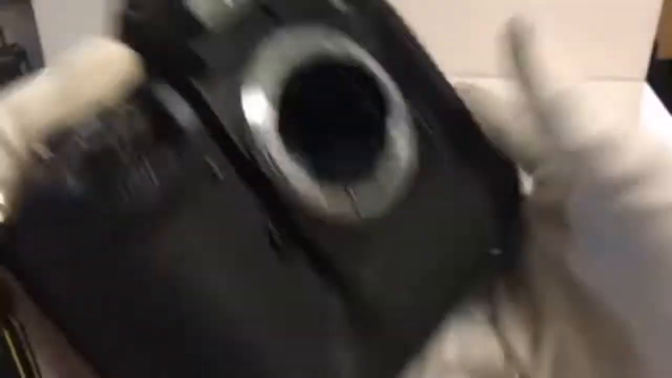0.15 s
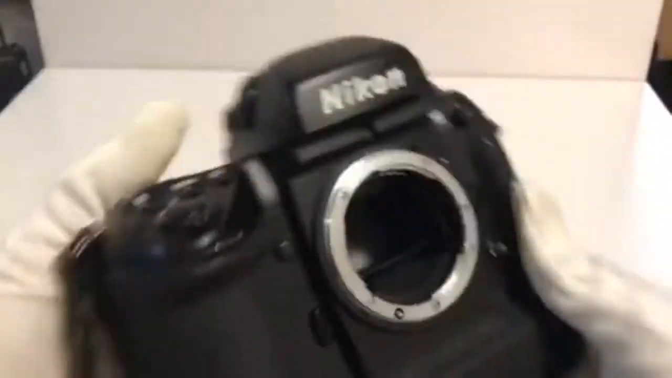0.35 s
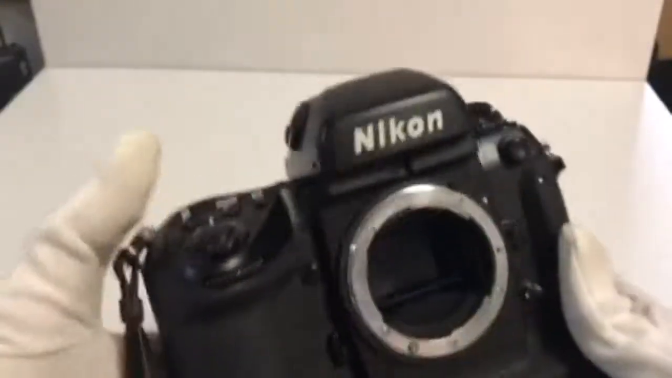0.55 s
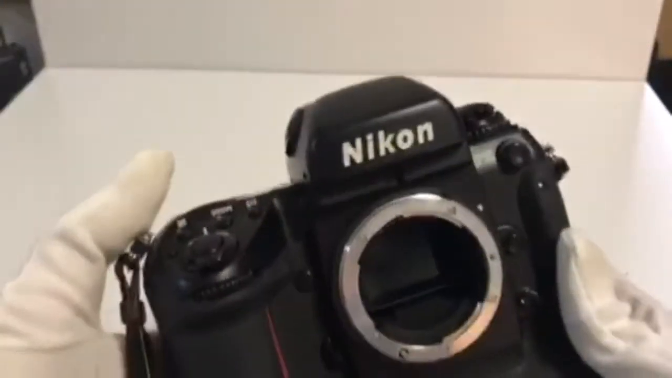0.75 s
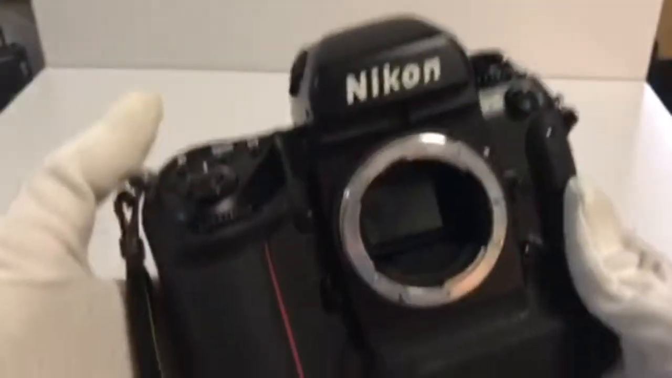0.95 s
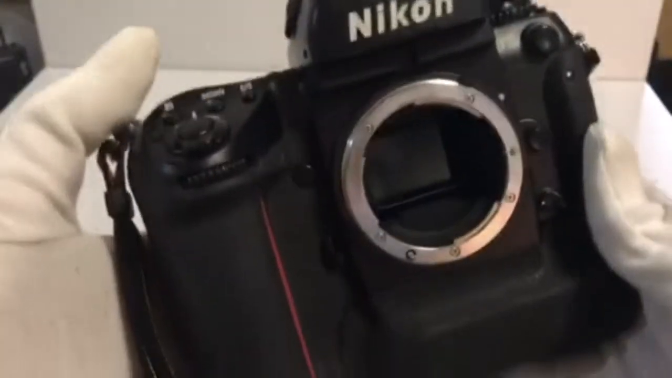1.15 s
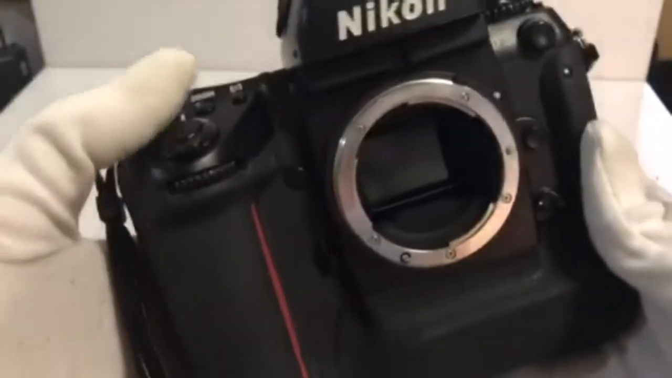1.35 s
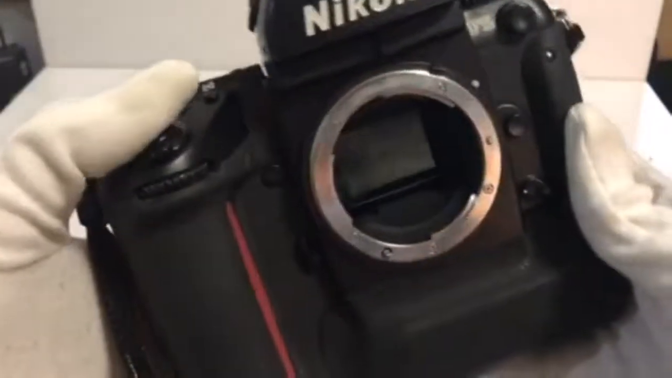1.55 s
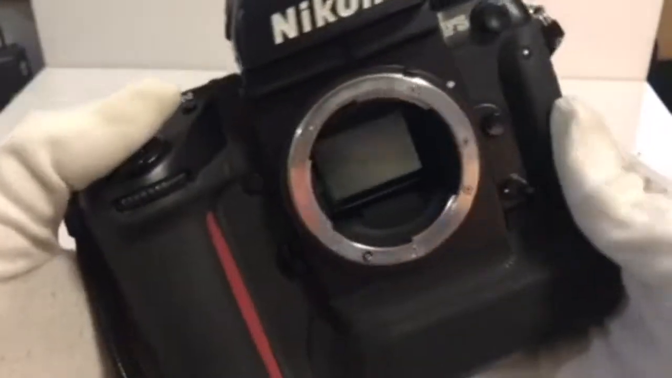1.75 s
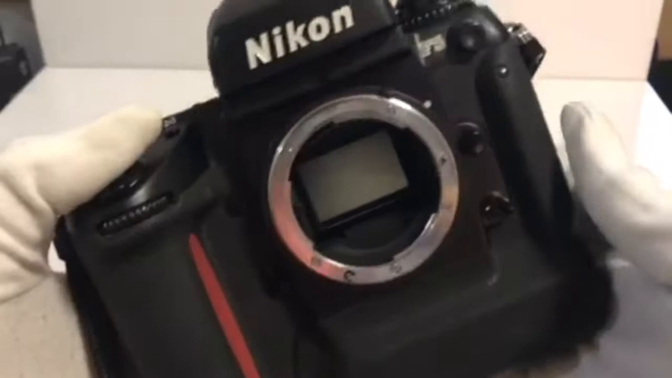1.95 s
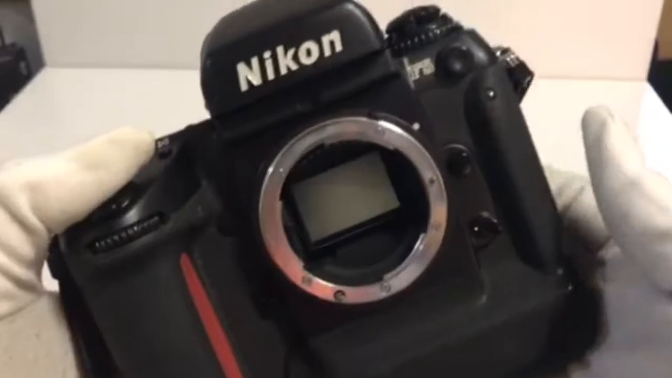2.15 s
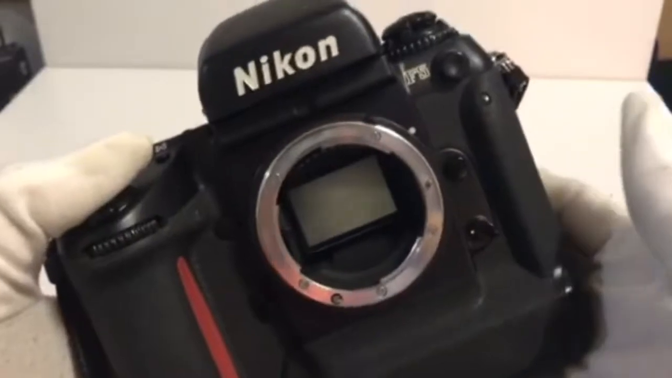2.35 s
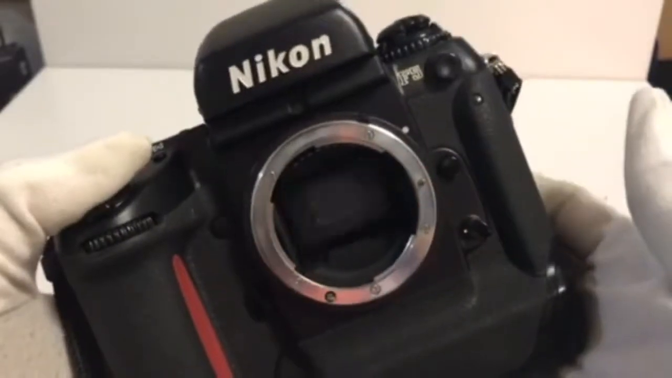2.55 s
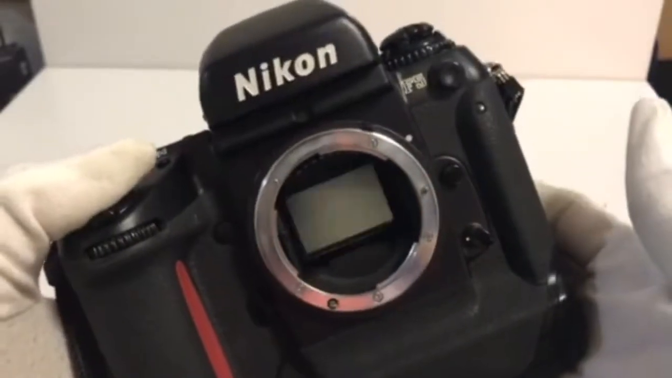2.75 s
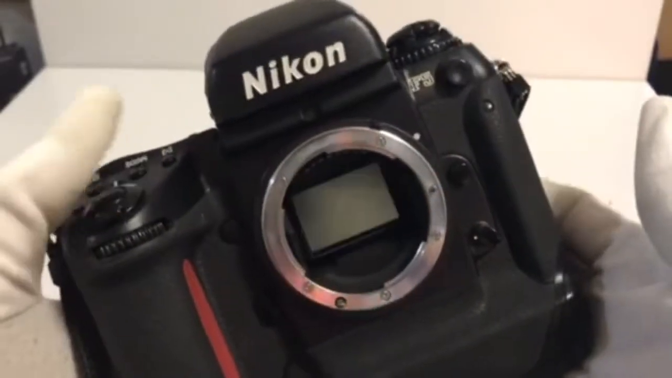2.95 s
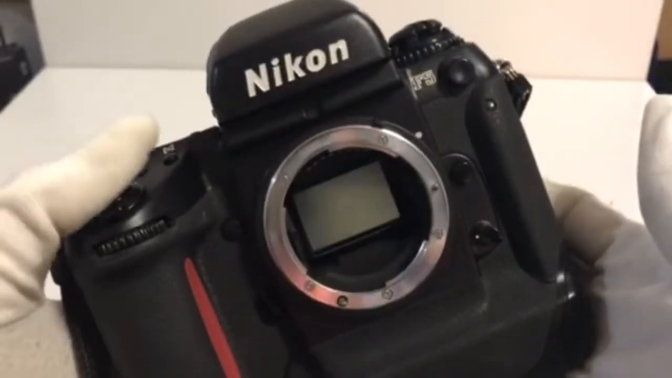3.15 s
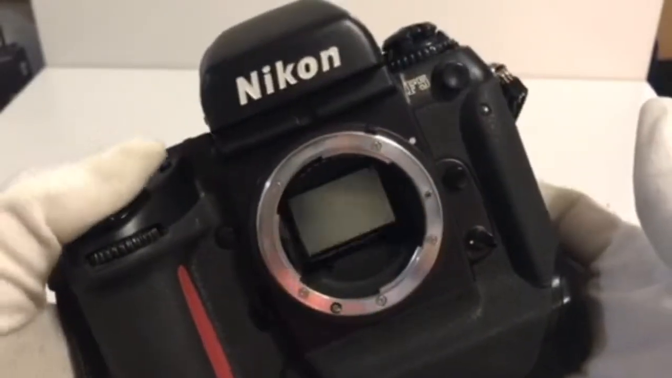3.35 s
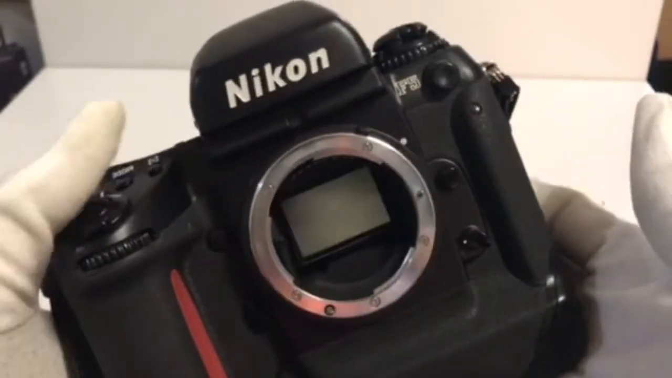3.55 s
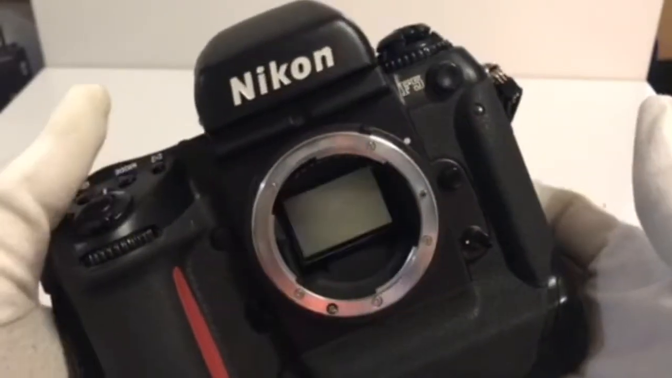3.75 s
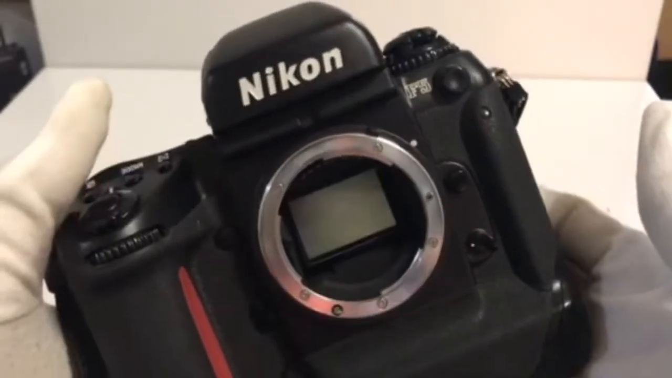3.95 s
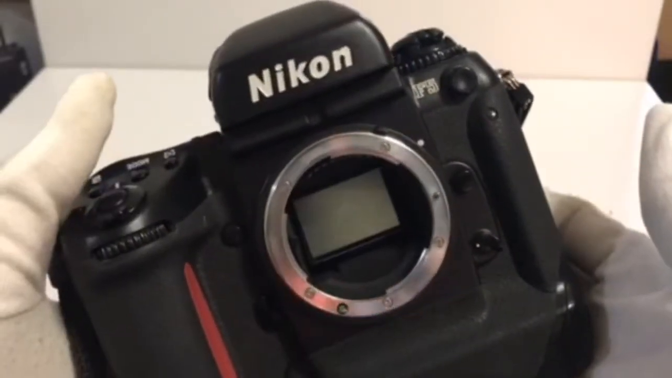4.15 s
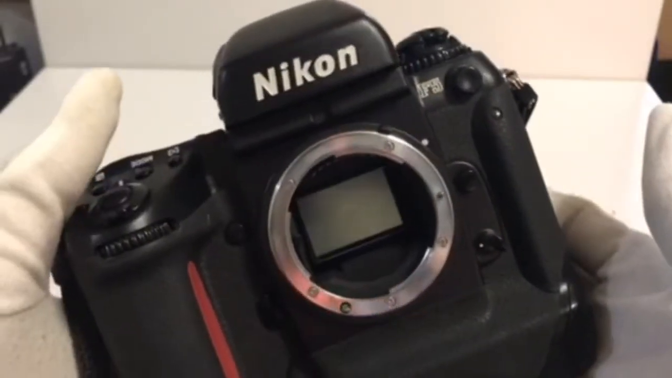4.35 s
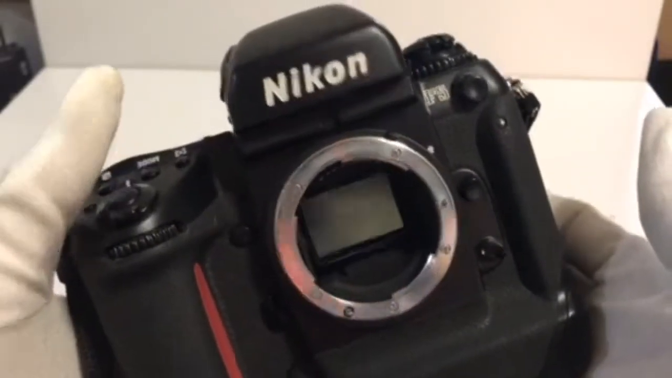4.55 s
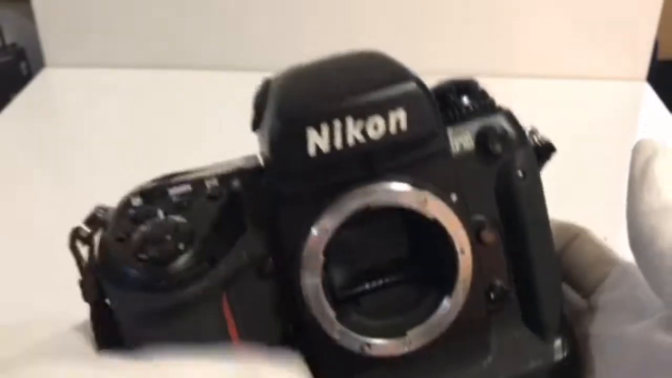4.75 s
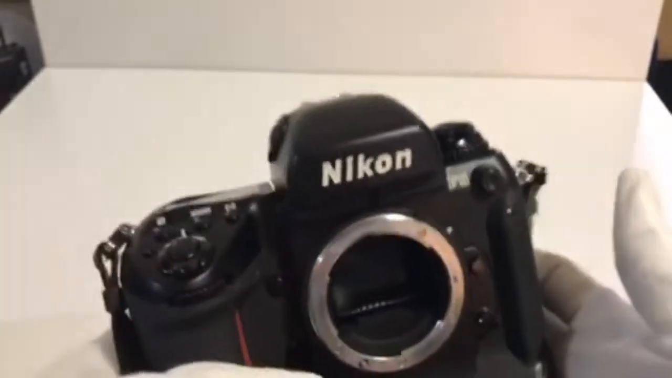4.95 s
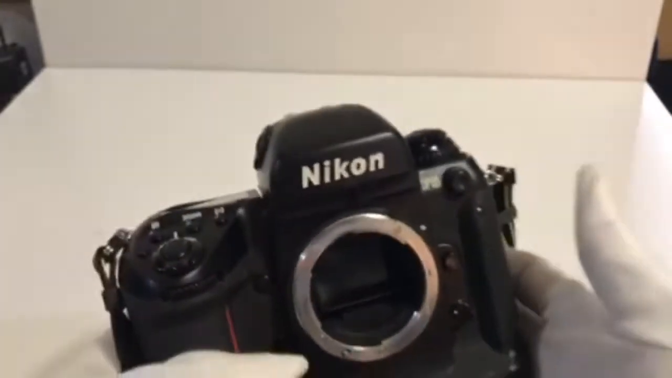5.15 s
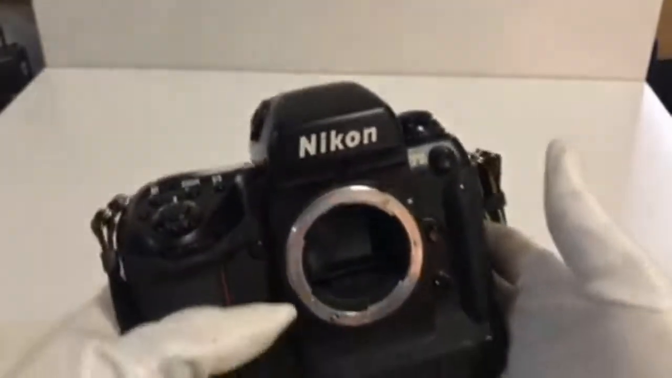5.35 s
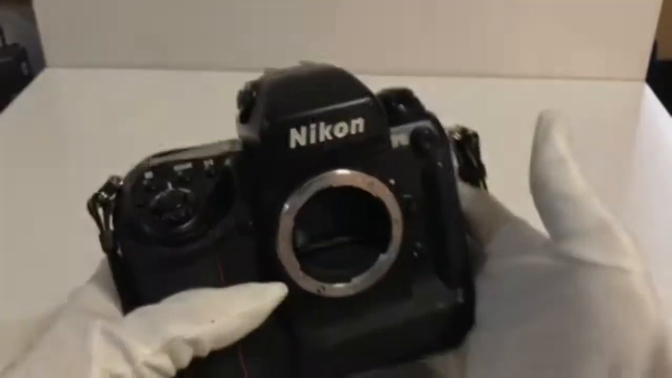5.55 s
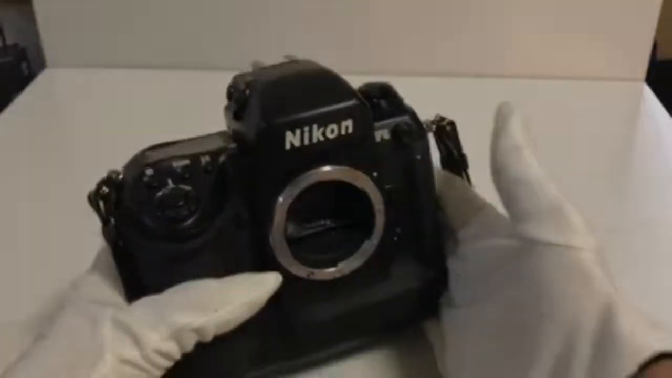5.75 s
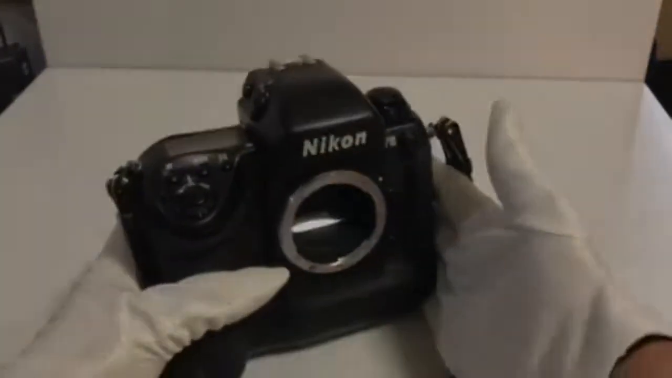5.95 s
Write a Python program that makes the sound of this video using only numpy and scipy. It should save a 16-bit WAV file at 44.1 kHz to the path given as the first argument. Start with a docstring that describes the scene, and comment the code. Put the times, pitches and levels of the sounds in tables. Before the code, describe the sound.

In a small quiet room, gloves rub faintly on a camera and it knocks softly against a table. Then, close to the microphone, the motor-driven film camera fires a quick burst of four sharp shutter and mirror clacks over chattering gears, followed by a burst of two. Faint rubbing, small strap ring ticks and a dull table bump follow, over a low appliance hum.

```python
"""In a small quiet room, a motor-driven film camera held close in gloved hands fires two short bursts.
Every frame repeats one chain of clicks (release, mirror up, shutter, mirror down, latches) over the
chatter of the winding gears; each click is a tiny rattle that sets its own part ringing. Before and
after, gloves rub on the camera, its strap rings tick and it bumps the table. An appliance hums
underneath, with a faint whine. A soft hiss comes up after the first burst and cuts off after the second.
"""
import sys
import numpy as np
from scipy import signal
from scipy.fft import rfft, irfft
from scipy.io import wavfile

SR = 44100
rng = np.random.default_rng(int(sys.argv[2]) if len(sys.argv) > 2 else 0)


def wrap_up_sound(samples):
    """Save the sound to the file named by the first command line argument, as 16-bit audio."""
    columns = np.atleast_2d(samples).T
    # keep every value between -1 and 1, then stretch to whole-number steps
    tamed = np.clip(columns, -1, 1)
    steps = np.round(tamed * 32767).astype(np.int16)
    wavfile.write(sys.argv[1], SR, steps)


N = 269010
TIME = np.arange(N) / SR


def from_db(db):
    return 10 ** (np.asarray(db) / 20)


def unit_level(x):
    """Scale a signal to an average power of 1."""
    return x / np.sqrt(np.mean(np.abs(x) ** 2) + 1e-20)


def at_hz(points, hz):
    """Read between the rows of a table that goes by frequency."""
    known_hz, values = np.transpose(points)
    return np.interp(np.log(np.maximum(hz, 1)), np.log(known_hz), values)


def add(track, start_s, sound):
    start = round(start_s * SR)
    track[start:start + len(sound)] += sound[:N - start]


def resonate(force, tone, modes=(), size=16384):
    """Shape a force as an object would: a broad tone, plus modes (pitches it likes to ring at)."""
    hz = np.fft.rfftfreq(size, 1 / SR)
    peaks = sum((from_db(db) ** 2 - 1) / (1 + (2 * (hz - pitch) / width) ** 2)
                for pitch, width, db in modes)
    gain = unit_level(from_db(at_hz(tone, hz)) * np.sqrt(np.abs(1 + peaks)))
    cepstrum = irfft(np.log(gain))[:size // 2]
    cepstrum[1:] *= 2   # minimum phase: nothing sounds before the blow
    response = irfft(np.exp(rfft(cepstrum, size)))
    return signal.fftconvolve(force, response)[:N]


def hiss_band(hz, width):
    """Noise gathered around one pitch."""
    return unit_level(signal.lfilter(*signal.iirpeak(hz, hz / width, fs=SR), rng.standard_normal(N)))


def swell(peak_s, rise_s, fall_s):
    """A smooth rise and fall in loudness."""
    return np.exp(-((TIME - peak_s) / np.where(TIME < peak_s, rise_s, fall_s)) ** 2)


def grains(spread_db):
    """A dense stream of tiny impacts of uneven size."""
    return unit_level(rng.standard_normal(N) * from_db(spread_db * np.minimum(rng.exponential(1, N), 5)))


def rattle(fade_s, habit=0, rise_s=.0003):
    """One contact: tiny impacts that die by 60 dB in fade_s; habit is a pattern that repeats."""
    t = np.arange(int(1.5 * fade_s * SR)) / SR
    fade = from_db(-60 * t / fade_s) * (1 - np.exp(-t / rise_s))
    flurry = (habit + rng.standard_normal(SR))[:len(t)]
    for _ in range(6):   # even it out so all frequencies are about equally strong
        even = irfft(np.exp(1j * np.angle(rfft(flurry * fade))), len(t))
        flurry = unit_level(even * fade / (fade ** 2 + 1e-3))
    return flurry * fade


# how long the room rings (frequency [Hz], time to fade by 60 dB [s])
ROOM_FADE = [(200, .36), (1500, .32), (4000, .24), (9000, .23), (16000, .18)]
def room_tail(sound, build_s=0.0071):
    """Many reflections blur into a short tail, the treble dying first."""
    t, tail = TIME[:SR // 2], 0
    edges = np.geomspace(120, 17000, 13)
    for low, high in zip(edges, edges[1:]):
        band = signal.butter(2, [low, high], "band", fs=SR, output="sos")
        fade = from_db(-60 * t / at_hz(ROOM_FADE, np.sqrt(low * high)))
        tail = tail + signal.sosfilt(band, rng.standard_normal(len(t))) * fade
    tail = tail * (1 - np.exp(-t / build_s))
    return signal.fftconvolve(sound, tail / np.linalg.norm(tail))[:N]


# tone of the room's air (frequency [Hz], relative level [dB])
AIR_TONE = [(15, -44), (25, -15.5), (39, -10), (59, -4.5), (74, -8), (87, -18.5), (120, -10.5), (206, -26),
            (344, -28), (775, -37), (1020, -34.5), (1160, -36), (4370, -48), (5000, -51), (16000, -56)]
# where the air rings (pitch [Hz], width [Hz], boost [dB])
AIR_MODES = [(343, 43, 7.3), (1024, 230, 4.9)]
def room_air():
    """A steady, soft rumble."""
    return from_db(-53) * resonate(rng.standard_normal(N), AIR_TONE, AIR_MODES)


# the whine's thin tones (pitch [Hz], width [Hz], level [dB])
WHINE_TONES = [(4500, 50, -83.5), (6480, 50, -92), (9060, 25, -94)]
def whine():
    """Very narrow bands of noise make a faint, steady whine."""
    return sum(from_db(level_db) * hiss_band(hz, width) for hz, width, level_db in WHINE_TONES)


# how loud the hum is as time passes (time [s], level [dB])
HUM_LEVEL = [(0.0, -46), (0.76, -55.5), (0.84, -44), (1.18, -54), (1.23, -46), (1.48, -61), (1.69, -46.5),
             (2.81, -53), (3.86, -50), (3.88, -56), (4.21, -44), (4.49, -54), (4.78, -45), (4.9, -56),
             (5.88, -50), (5.9, -53)]
# the hum's tones (pitch [Hz], relative level [dB], share that wavers [0-1])
HUM_TONES = [(56.2, -1.5, 0.4), (117, -6, 0.3)]
def appliance_hum(waver_hz=8.0):
    """An appliance hums with two low, wavering tones."""
    hum, slow = 0, signal.butter(4, waver_hz, fs=SR, output="sos")
    for hz, level_db, waver in HUM_TONES:
        noise = rng.standard_normal(N + SR) + 1j * rng.standard_normal(N + SR)
        sway = signal.sosfilt(slow, noise)[SR:]
        sway = unit_level(sway / np.sqrt(np.abs(sway)))   # more in pitch than in level
        tone = np.real((1 - waver + waver * sway) * np.exp(2j * np.pi * hz * TIME))
        hum = hum + from_db(level_db) * unit_level(tone)
    return from_db(np.interp(TIME, *np.transpose(HUM_LEVEL))) * hum


# tone of the hiss (frequency [Hz], relative level [dB])
HISS_TONE = [(500, 4), (2000, 0.5), (5000, -0.5), (9000, -4), (15500, -8.5)]
def soft_hiss(on_s=2.9, off_s=4.06, rise_s=.08, fall_s=.01):
    """A hiss comes up as the first burst ends, holds, and stops abruptly a little after the second."""
    held = np.clip((TIME - on_s) / rise_s, 0, 1) * np.clip((off_s - TIME) / fall_s, 0, 1)
    return from_db(-63.5) * held * resonate(rng.standard_normal(N), HISS_TONE)


# each shift of grip (time of peak [s], rise [s], fall [s], level [dB])
GLOVE_STROKES = [(.02, .1, 0.1, -62), (.25, .03, 0.11, -62.5), (.43, .045, .09, -55), (.55, .06, .08, -61),
                 (1.40, 0.063, 0.084, -73.5), (4.72, 0.078, 0.075, -67.5), (5.2, 0.37, .2, -66.5),
                 (5.33, 0.042, .04, -56.5), (5.56, 0.17, 0.14, -62.5), (5.91, 0.22, 0.088, -56.5)]
# tone of the rubbing (frequency [Hz], relative level [dB])
GLOVE_TONE = [(710, -38), (1200, -5.5), (3360, -2), (4910, -4), (9310, -3), (10300, -5.5), (14700, -1),
              (16000, -5.5)]
def gloves(catch_db=1.6, catch_hz=80):
    """Cotton fibres catch and slip on the camera in clumps; each stroke swells and fades."""
    slow = signal.butter(2, catch_hz, fs=SR, output="sos")
    catching = unit_level(signal.sosfilt(slow, rng.standard_normal(N)))
    power = sum((from_db(db) * swell(s, rise, fall)) ** 2 for s, rise, fall, db in GLOVE_STROKES)
    return np.sqrt(power) * from_db(catch_db * catching) * resonate(grains(spread_db=3.5), GLOVE_TONE)


# short slides (time of peak [s], length [s], level [dB], pitch [Hz], width [Hz])
SLIDES = [(0.653, .08, -75.5, 6500, 1000), (0.818, .09, -72.5, 6500, 1000),
          (0.92, 0.078, -71.5, 6500, 1000), (1.043, 0.099, -70, 2500, 2500),
          (4.71, 0.22, -67.5, 2110, 2480), (5.581, 0.19, -63, 11900, 3446), (6.001, 0.092, -58, 2800, 1200)]
def slides():
    """Cloth and rubber slide briefly, each time with a hiss of its own pitch."""
    return sum(from_db(level_db) * swell(s, length / 2, length / 2) * hiss_band(hz, width)
               for s, length, level_db, hz, width in SLIDES)


# ticks of the strap rings and fittings (time [s], level [dB], pitch [Hz], width [Hz])
STRAP_TICKS = [(0.293, -46, 8400, 1500), (1.781, -48.5, 3920, 600), (2.429, -57.5, 6435, 6000),
               (4.712, -54, 12000, 6000), (5.003, -50, 12000, 9000), (5.0236, -39, 11000, 13000),
               (5.1280, -39.5, 8260, 11800), (5.5, -39, 4600, 2800), (5.589, -37.5, 1480, 600),
               (5.852, -43, 10700, 9000)]
# tone of the metal (frequency [Hz], relative level [dB])
METAL_TONE = [(400, 1), (1500, -2), (15000, -4)]
# where the metal rings (pitch [Hz], width [Hz], boost [dB])
METAL_MODES = [(2750, 100, 12), (5650, 220, 11), (6380, 120, 9.5), (9100, 110, 8), (10000, 120, 7),
               (12500, 300, 10), (13300, 200, 9)]
def strap_rings(fade_s=0.017, faint_per_s=5, faint_db=-46):
    """Metal touches metal and sets the strap rings ringing; fainter ticks come at random."""
    force = np.zeros(N)
    for s, level_db, hz, width in STRAP_TICKS:
        band = signal.iirpeak(hz, hz / width, fs=SR)
        add(force, s, from_db(level_db) * signal.lfilter(*band, rattle(fade_s)))
    faint = (rng.random(N) < faint_per_s / SR) * rng.uniform(-1, 1, N)
    return resonate(force + from_db(faint_db) * faint, METAL_TONE, METAL_MODES)


# the camera meets the table (time [s], level [dB], dulled above [Hz], rocking time [s])
BUMPS = [(0.055, -45.5, 600, 0.09), (0.575, -25, 725, 0.054), (0.590, -39, 600, 0.1),
         (0.621, -37, 400, 0.08), (5.824, -40.5, 700, 0.083), (5.852, -43, 700, 0.11),
         (5.951, -33, 3500, 0.02), (5.952, -39, 900, 0.15)]
# tone of the table (frequency [Hz], relative level [dB])
TABLE_TONE = [(50, -35), (110, 1.5), (200, 4.5), (290, -7), (460, -3), (1000, -12.5), (1700, -13),
              (2500, -19), (15000, -9)]
# where the table rings (pitch [Hz], width [Hz], boost [dB])
TABLE_MODES = [(117.5, 13, 13.5), (234, 14, 7.5), (412, 49, 8), (618, 29, 5.5), (770, 16, 6.5)]
# the table top's deep swings (pitch [Hz], relative level [dB], fade time [s])
TABLE_SWINGS = [(114, 0, .16), (160, 0, .12), (60, -15, .3)]
def table_bumps(set_down_s=5.953, weight_db=-17, give_s=0.0035):
    """Padded knocks on the table; the last carries the camera's weight and sets the top swinging."""
    force, swing, t = np.zeros(N), np.zeros(N), TIME[:SR]
    for s, level_db, dull_hz, fade_s in BUMPS:
        padding = signal.butter(2, dull_hz, fs=SR)
        add(force, s, from_db(level_db) * signal.lfilter(*padding, rattle(fade_s)))
    load = from_db(weight_db) * (1 - np.exp(-t / give_s))   # the rubber base gives way first
    for hz, level_db, fade_s in TABLE_SWINGS:
        add(swing, set_down_s, -load * from_db(level_db - 60 * t / fade_s) * np.sin(2 * np.pi * hz * t))
    return resonate(force, TABLE_TONE, TABLE_MODES) + swing


# the gears lift the mirror, work the shutter and wind the film (time from mirror up [s], level [dB], fall
# [dB/s])
GEAR_JOBS = [(-.005, -26, 649.5), (.028, -26, 480), (.058, -27, 255.5)]
def gears(frames, on_s=-.021, off_s=.116, rise_db_per_s=649.5, tooth_hz=520):
    """The gears chatter tooth by tooth; each job loads them quickly, then lets them run down."""
    t = np.arange(on_s, off_s, 1 / SR)
    jobs_db = [db - np.maximum(rise_db_per_s * (s - t), fall * (t - s)) for s, db, fall in GEAR_JOBS]
    load = from_db(np.max(jobs_db, axis=0))
    drive = np.zeros(N)
    for s in frames:
        add(drive, s + on_s, load)
    teeth = 1 + 0.32 * np.cos(2 * np.pi * tooth_hz * TIME)
    return drive * unit_level(grains(spread_db=1.0) * teeth)


def strike_parts(forces, clicks, moments, scatter_db=.5):
    """Add clicks to each part's force; a click rattles much the same way every time it comes round."""
    for offset, level_db, fade_s, part in clicks:
        habit = 2 * rng.standard_normal(SR)
        for s in moments:
            click = rattle(fade_s, habit) * from_db(level_db + scatter_db * rng.standard_normal())
            add(forces[part], s + offset, click)


# the two bursts (time the mirror first hits its upper stop [s], frames [count])
BURSTS = [(2.4747, 4), (3.3716, 2)]
# clicks of every frame, of the drive engaging for a burst, and of it braking afterwards
# (time from mirror up [s], level [dB], rattle time [s], part)
FRAME_CLICKS = [(-.0214, -16, .022, "lever"), (-.0210, -16.5, .012, "blade"), (-.0117, -15, .015, "blade"),
                (-.0011, -13.5, 0.01, "mirror up"), (.0018, -26, .014, "blade"),
                (0.011, -20, .009, "blade"), (0.0147, -13, 0.02, "blade"), (0.0181, -9.5, .008, "blade"),
                (0.0197, -12, 0.0088, "shutter"), (.0210, -2.5, .006, "shutter"),
                (.0470, -18, 0.024, "mirror down"), (.0490, -14.5, .018, "mirror down"),
                (0.0504, -8.5, 0.014, "mirror down"), (0.0549, -10.5, 0.015, "mirror catch"),
                (0.0898, -31, .020, "blade"), (0.1034, -21, 0.022, "blade"), (0.11, -15, 0.015, "lever")]
START_CLICKS = [(-.0216, -15.5, 0.033, "blade"), (-.0050, -26.5, .050, "blade")]
BRAKE_CLICKS = [(.1130, -35, 0.068, "brake"), (.1310, -20.5, 0.016, "brake"),
                (.1390, -32.5, 0.016, "brake")]
# tone of each part, and of the housing (frequency [Hz], relative level [dB])
PART_TONES = { "lever": [(180, -29), (400, -15.5), (800, -15), (1000, -3.5), (2000, -4.5), (3200, -3.5),
              (4800, -6.5), (7000, -8), (9000, -11.5), (15500, -10.5)], "blade": [(180, -28), (450, -13.5),
              (850, -9.5), (1200, -4), (1700, -13.5), (2300, -1), (3200, -6.5), (7000, -0.5), (9500, -3),
              (12500, -2.5), (15500, -5)], "mirror up": [(140, -24), (260, -7.5), (390, 1), (550, -3),
              (1150, 1.5), (1800, -11), (2800, -16), (5000, -20.5), (12000, -16.5), (15500, -12.5)],
              "shutter": [(200, -28), (400, -19), (800, -22), (1200, -10.5), (1750, -27.5), (2200, -6),
              (3600, -19.5), (3950, 2), (5200, -4.5), (7000, -10.5), (10000, -17), (15500, -12)],
              "mirror down": [(170, -22), (340, -2), (560, -12.5), (1000, -7.5), (1400, 0.5), (1680, -13.5),
              (2100, -4), (3000, -2), (5200, -4.5), (7000, -3.5), (10300, -6.5), (11600, 0), (12800, -2.5),
              (15500, -2)], "mirror catch": [(170, -21.5), (380, -7.5), (560, -13.5), (1400, -4.5),
              (1680, -14), (2100, -6), (4200, 0.5), (8000, -7), (11600, 0), (15500, -6)],
              "brake": [(180, -26.5), (400, -13), (1000, -4.5), (1450, 0.5), (1700, -11.5), (2000, -3),
              (3400, -0.5), (5000, -8), (10500, -13.5), (15500, -23.5)], "gears": [(170, -18.5), (280, -7),
              (550, -10), (1000, -2.5), (1400, -0.5), (1680, -10), (2200, -0.5), (4100, -4.5), (6200, -6.5),
              (8800, -7), (9800, -8.5), (11200, -5), (15500, -12)]}
HOUSING_TONE = [(150, -0.5), (300, 1), (550, -1.5), (1000, 0), (3500, .5), (15000, 0)]
# where each part rings, and the housing (pitch [Hz], width [Hz], boost [dB])
PART_MODES = { "lever": [(2030, 150, 8.5), (2599, 76, 2.5), (2770, 85, -2), (14300, 490, 7.5)],
              "blade": [(1190, 70, 4), (6535, 150, 2.5), (7150, 160, 2), (8200, 170, 3), (11500, 180, 3.5)],
              "mirror up": [(1190, 120, 0), (2280, 96, 11.5), (14340, 500, 8.5)],
              "shutter": [(4050, 180, 4), (4780, 130, 4), (5390, 110, 5), (6255, 150, 6), (7700, 180, 5),
              (15640, 300, 7)], "mirror down": [(2627, 70, 4), (3170, 35, 7), (3348, 50, 9),
              (11552, 150, 5)], "mirror catch": [(3348, 46, 17.5), (4190, 50, 6), (5205, 55, 9),
              (6430, 40, 5)], "brake": [(1510, 30, 11), (1981, 70, 6), (3294, 90, 5)],
              "gears": [(1390, 35, 4.5), (4145, 60, 3), (5100, 80, 4), (7103, 150, 2.5)]}
HOUSING_MODES = [(436, 24, 4), (613, 26, 3), (1190, 28, 2), (1245, 22, 3), (2182, 45, 4), (4345, 60, 3)]
def camera(frame_s=.137):
    """Clicks and gears set their own parts ringing, and the housing carries the sound of them all."""
    bursts = [start + frame_s * np.arange(count) for start, count in BURSTS]
    frames = np.concatenate(bursts)
    forces = {part: np.zeros(N) for part in PART_TONES}
    forces["gears"] = gears(frames)
    strike_parts(forces, FRAME_CLICKS, frames)
    strike_parts(forces, START_CLICKS, [burst[0] for burst in bursts])
    strike_parts(forces, BRAKE_CLICKS, [burst[-1] for burst in bursts])
    parts = sum(resonate(force, PART_TONES[part], PART_MODES[part]) for part, force in forces.items())
    return resonate(parts, HOUSING_TONE, HOUSING_MODES)


# echoes from the backdrop and the nearest wall (delay [s], level [dB])
ECHOES = [(.0031, -20.5), (0.013, -23.5)]
def scene():
    """The close camera, its echoes and the room's tail, over the rubbing and the background."""
    near = camera() + table_bumps() + strap_rings()
    mix = near + from_db(-22.5) * room_tail(near) + gloves() + slides()
    mix += room_air() + whine() + appliance_hum() + soft_hiss()
    for delay, level_db in ECHOES:
        add(mix, delay, from_db(level_db) * near)
    return mix[None]


def record(dry, bass_hz=38, ceiling=1.3, top_hz=16000):
    """The deepest bass is lost, the highest peaks are rounded and the very top of the treble is cut."""
    trimmed = signal.sosfilt(signal.butter(4, bass_hz, "high", fs=SR, output="sos"), dry)
    rounded = ceiling * np.tanh(trimmed / ceiling)
    return signal.fftconvolve(rounded, signal.firwin(301, top_hz, fs=SR)[None], "same")


dry = scene()
out = record(dry)
wrap_up_sound(out)
```